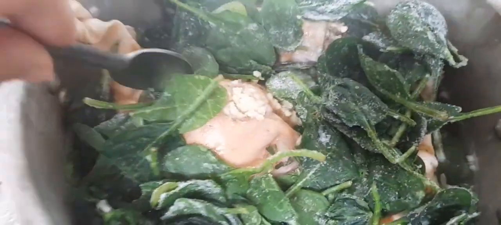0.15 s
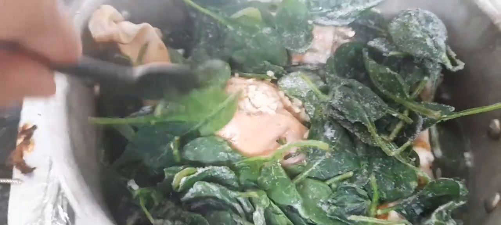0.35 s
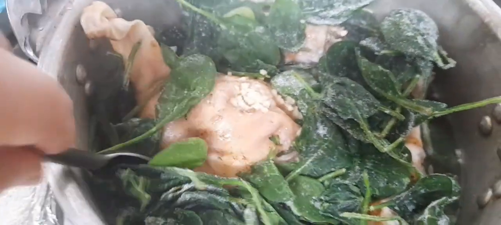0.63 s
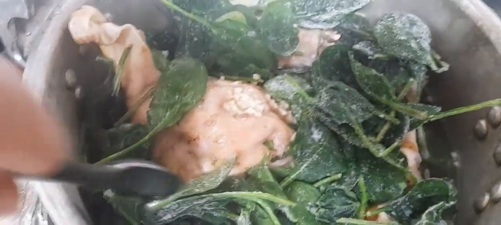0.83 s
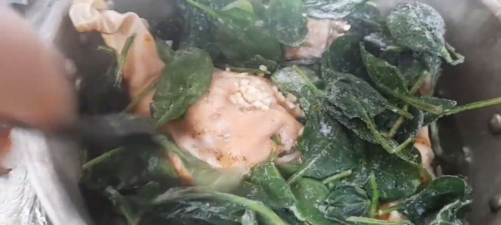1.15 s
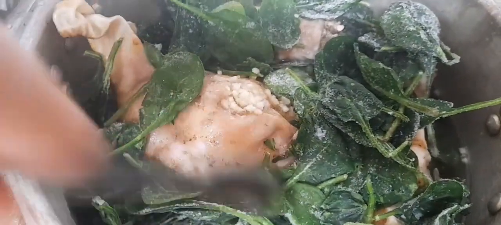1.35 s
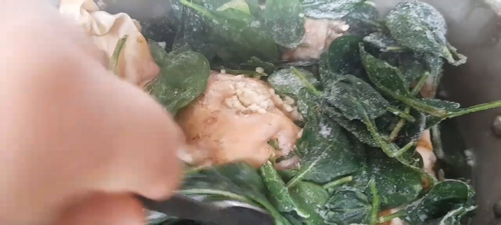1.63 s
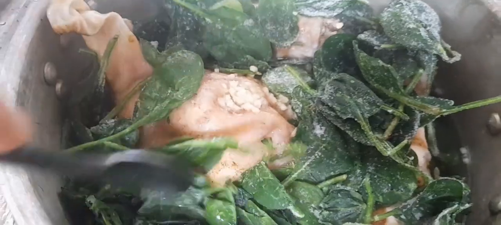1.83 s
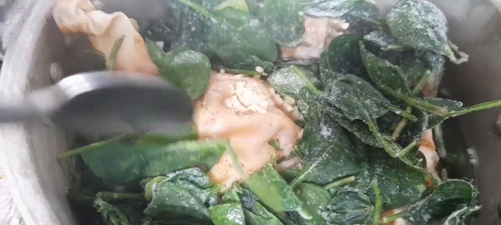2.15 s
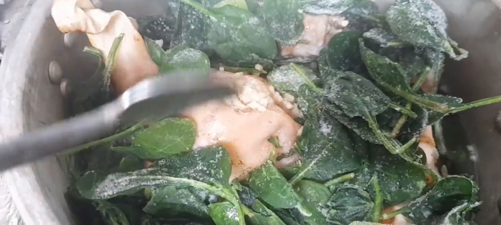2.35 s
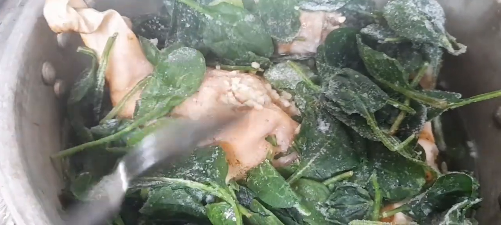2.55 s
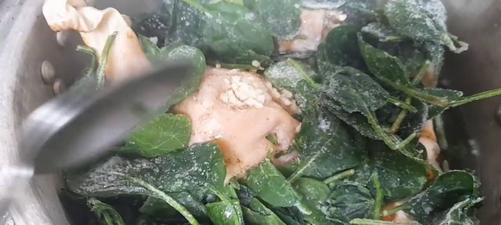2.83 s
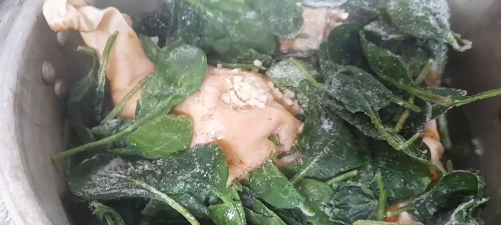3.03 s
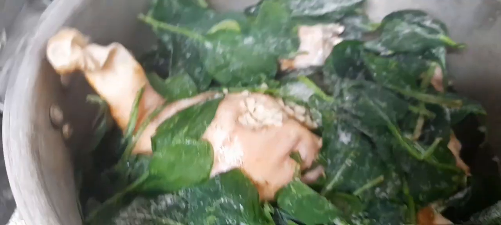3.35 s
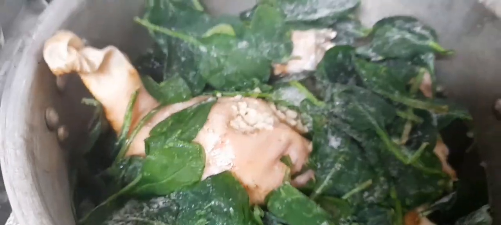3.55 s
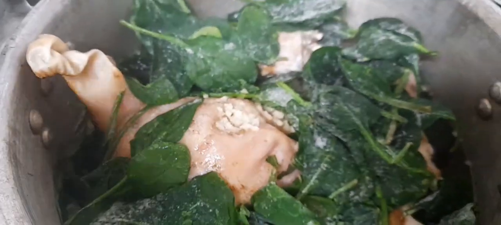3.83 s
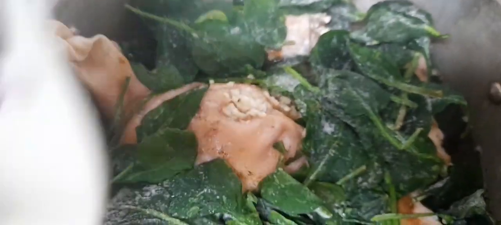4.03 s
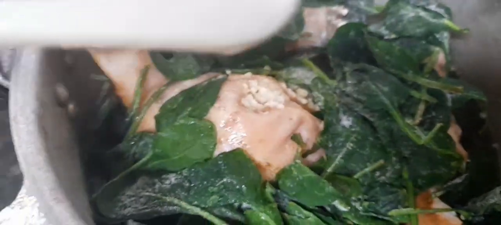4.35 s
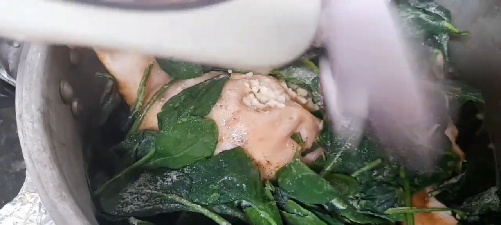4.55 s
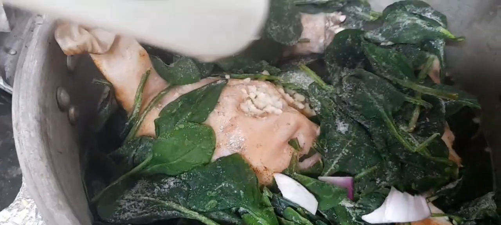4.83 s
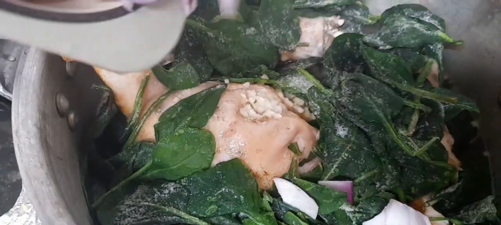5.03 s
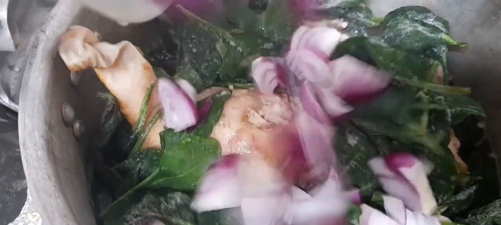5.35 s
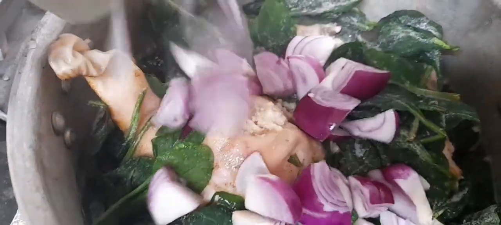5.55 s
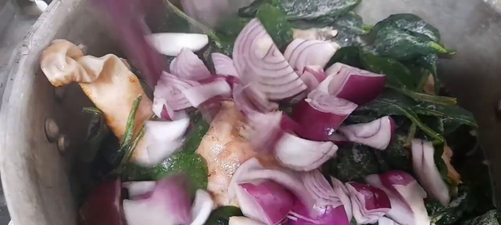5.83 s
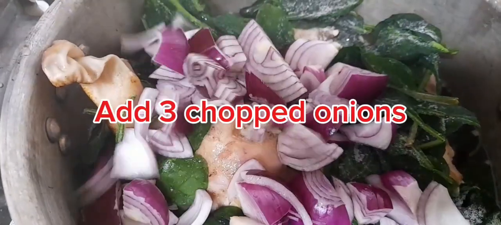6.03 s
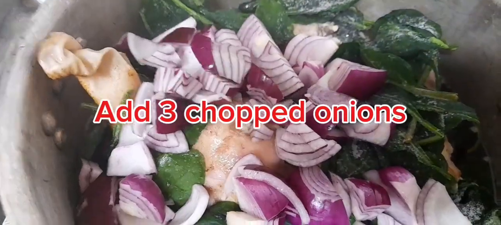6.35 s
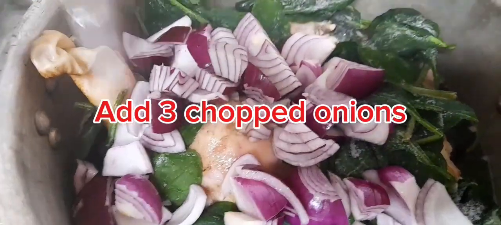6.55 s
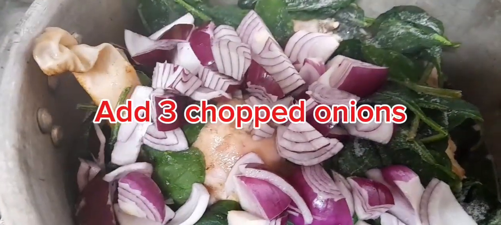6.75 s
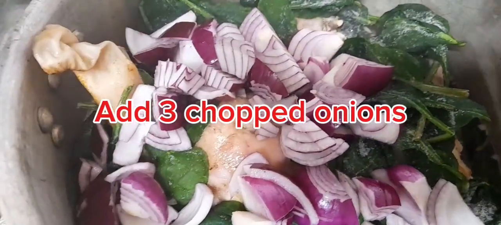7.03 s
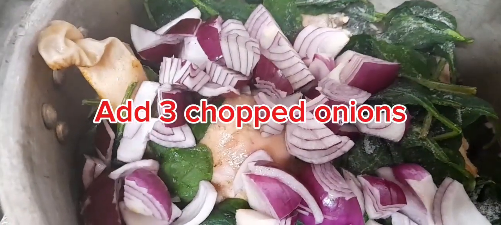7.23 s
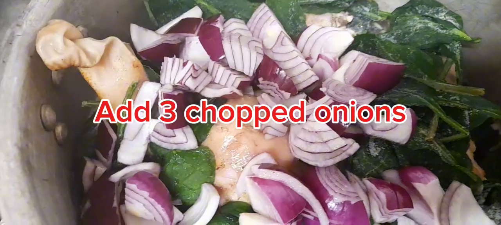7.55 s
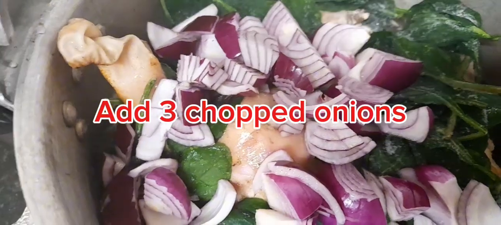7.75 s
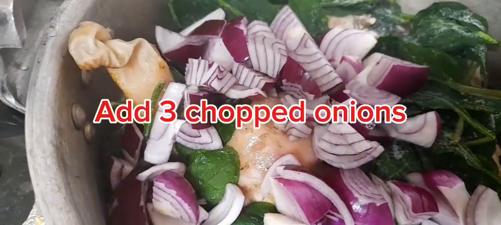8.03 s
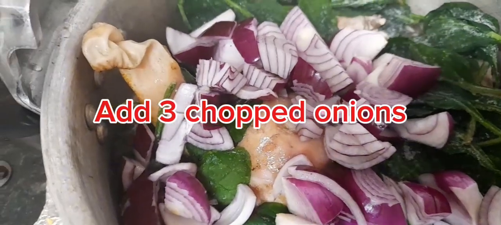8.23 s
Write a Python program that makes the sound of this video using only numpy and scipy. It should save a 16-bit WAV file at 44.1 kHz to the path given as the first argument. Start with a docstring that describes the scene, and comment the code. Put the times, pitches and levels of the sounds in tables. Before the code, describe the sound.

A spoon scrapes and crackles through wet spinach in a metal pot, clacks down loudly, then chopped onion tumbles in while a bird chirps.

```python
"""Spinach and onion in a metal pot

Kitchen, microphone close to the pot. A spoon pushes wet spinach around meat and is put down with a clack.
After a few dull bumps, chopped onion tumbles from a plate onto the leaves and the plate is slid away.
Leaves, friction and onion are filtered random clicks; knocks and bumps are bursts and decaying tones.
A small bird chirps nearby as gliding tones, the room answers briefly, and a faint low drone swells up."""
import sys
import numpy as np
from scipy import signal
from scipy.fft import rfft, irfft
from scipy.io import wavfile
from scipy.ndimage import uniform_filter1d

SR = 44100
rng = np.random.default_rng(int(sys.argv[2]) if len(sys.argv) > 2 else 0)


def put_to_file(sound):
    """Save the sound as 16-bit audio at rate SR, in the file named by the first command-line argument."""
    columns = np.atleast_2d(sound).T  # one column per channel
    safe = np.clip(columns, -1, 1)
    whole_steps = np.round(safe * 32767)
    wavfile.write(sys.argv[1], SR, whole_steps.astype(np.int16))


N = 370440
T = np.arange(N) / SR  # seconds

# Room air at the microphone. Each row: frequency in Hz, relative level in dB.
AIR_SPECTRUM = [(15, -58), (25, -22), (161, -8.5), (212, -19), (335, -14.5), (439, -23.5), (624, -32.5),
                (677, -29.5), (1740, -38), (3920, -37), (4610, -32.5), (7510, -46), (9840, -37.5),
                (14000, -41.5), (16000, -45.5)]
AIR_DB = -70
# Noise that flutters around the drone. Each row: frequency in Hz, relative level in dB.
FLUTTER_SPECTRUM = [(60, -33), (150, -11), (220, 1.5), (300, -1), (370, -19.5), (520, -30), (1500, -62.5)]
# The low drone is faint at first, then swells and holds.
DRONE_HZ, DRONE_FAINT_DB, DRONE_DB, DRONE_STARTS_S, DRONE_SWELL_S = 219, -72.5, -60.5, 3.28, 0.35

# Decay of the small hard kitchen. Each row: frequency in Hz, t60 in seconds.
KITCHEN_DECAY = [(100, .6), (350, .55), (1000, .32), (2500, 0.25), (6000, 0.23), (15000, 0.13)]

# Friction shaking pot and worktop. Each row: frequency in Hz, relative level in dB.
DRAG_BODY_SPECTRUM = [(30, -18), (70, -11.5), (150, -9), (300, 2), (450, -7.5), (700, -16.5), (1200, -29.5),
                      (3000, -62)]
# Rough contact. Each row: frequency in Hz, relative level in dB.
DRAG_GRIT_SPECTRUM = [(250, -19), (600, 2), (900, 4), (1500, -5), (2600, -4.5), (5000, -6.5), (7500, -20),
                      (15000, -18)]
# Pushes of the spoon, later of the plate.
# Each row: start in seconds, length in seconds, body level in dB, grit level in dB.
FIRM_PUSHES = [(0.08, 0.15, -50.5, -57), (0.18, 0.066, -43, -56), (0.27, 0.063, -55, -51),
               (0.39, 0.062, -54.5, -53), (0.45, .1, -55.5, -48), (0.65, .075, -49.5, -45.5),
               (0.915, 0.13, -43, -45.5), (1.235, 0.036, -49.5, -75), (1.41, .075, -48, -47.5),
               (1.5, 0.14, -71, -53), (1.75, 0.089, -46, -52), (1.84, 0.098, -51, -47),
               (1.945, 0.028, -42.5, -51), (2.195, 0.061, -60, -52), (2.305, .045, -54.5, -63.5),
               (2.4, 0.099, -66, -64), (2.575, 0.063, -51, -70.5), (2.625, 0.035, -44, -53.5),
               (7.07, 0.19, -58.5, -74.5), (7.235, 0.16, -57.5, -66), (7.34, 0.14, -49.5, -60),
               (7.455, 0.044, -47.5, -60.5), (7.6, .06, -69, -69), (7.78, 0.09, -74, -59.5),
               (7.825, 0.11, -52.5, -61), (7.98, 0.093, -55, -71), (8.11, 0.22, -56.5, -70),
               (8.22, 0.051, -45.5, -60), (8.3, 0.1, -64, -66.5)]
PUSH_ATTACK_S, PUSH_SAG_DB_PER_S, PUSH_T60_S = .025, 23.5, 0.094
# Between pushes the spoon keeps sliding on the leaves.
# Each row: start in seconds, length in seconds, body level in dB, grit level in dB.
LIGHT_SLIDES = [(0.0, 0.78, -62.5, -64.5), (0.74, 0.62, -57, -58), (1.42, .62, -57.5, -59),
                (2.05, .4, -67, -65)]
SLIDE_ATTACK_S, SLIDE_SAG_DB_PER_S, SLIDE_T60_S = 0.044, 6.5, 0.21

# Wet leaves. Each row: frequency in Hz, relative level in dB.
LEAF_SPECTRUM = [(590, -38), (1000, -20.5), (1790, -20), (2710, -2.5), (2940, -4.5), (3980, -0.5),
                 (6780, -5), (8260, -6.5), (8960, -12), (9940, -4.5), (13900, -5), (16000, -11)]
# The spoon crushes a bunch of leaves. Each row: start in seconds, length in seconds, level in dB.
LEAF_CRUSHES = [(0.081, 0.014, -46), (0.116, 0.023, -36.5), (0.275, 0.071, -51.5), (0.455, 0.021, -39.5),
                (0.497, 0.059, -35), (0.71, 0.068, -43), (0.81, 0.12, -48), (0.9, .15, -35.5),
                (1.06, 0.054, -49), (1.12, 0.18, -56), (1.3, 0.21, -62), (1.48, 0.18, -40.5),
                (1.548, 0.049, -30.5), (1.672, 0.044, -38), (1.724, 0.044, -32.5), (1.815, 0.021, -32),
                (1.884, 0.032, -33), (1.932, 0.017, -34.5), (1.985, 0.0079, -36.5)]
CRUSH_ATTACK_S, CRUSH_SAG_DB_PER_S, CRUSH_T60_S = 0.018, 17.5, 0.12
# Stems that snap. Each row: start in seconds, peak in dB before panning, ring in Hz,
# ring strength as a ratio, left minus right in dB.
STEM_SNAPS = [(0.0823, -33, 4900, 0.11, 6), (0.1225, -23.5, 4500, .1, -11), (0.1515, -22, 3230, 0.26, 3),
              (0.4609, -29.5, 2770, 0.54, 10), (0.5021, -23.5, 4450, .1, 1), (0.8345, -23.5, 4300, .1, 5.5),
              (1.031, -16, 4260, 0.26, -1), (1.0444, -18, 2591, .15, -8), (1.0893, -19, 4230, 1.4, -4.5),
              (1.2537, -29, 6260, .5, 8), (1.5643, -33, 5547, .2, -4), (1.7303, -17.5, 4360, 0.54, 0),
              (1.7695, -16.5, 3400, .8, -4), (1.8835, -18.5, 4740, .3, 0), (1.9075, -15.5, 4500, .6, -4),
              (1.9395, -18.5, 2940, .5, 1), (1.9793, -22.5, 4540, 0.49, 1)]

# Hard knocks of spoon and plate. Each row: start in seconds, level in dB, contact cut-off in Hz,
# room level in dB, left minus right in dB.
HARD_KNOCKS = [(0.715, -2.5, 2670, -7, 0), (2.6631, 7.5, 11750, -2.5, -7.5), (3.349, -34, 4770, -3, -24),
               (3.388, -28, 5400, 2, -14.5), (3.494, -37.5, 11000, -5, -15.5),
               (4.333, -18.5, 5740, 4.5, -7.5), (6.662, -32.5, 5350, -4.5, -2)]
# Clack of the contact. Each row: frequency in Hz, relative level in dB.
CLACK_SPECTRUM = [(60, -20), (150, -3), (300, -3), (600, -9), (1100, -9.5), (2000, -4), (2900, -7.5),
                  (4200, -1.5), (7000, -8.5), (11000, -9.5), (16000, -1.5)]
# Ringing modes of the metal. Each row: frequency in Hz, relative level in dB.
METAL_MODES = [(161.5, -49.5), (290.7, -49.5), (452.2, -53), (969.0, -61), (1453, -54.5), (1642, -60),
               (1949, -59), (2277, -60), (2929, -54.5), (3133, -59.5), (3305, -59.5), (3639, -65),
               (3946, -58.5), (4430, -60.5), (5356, -63), (6029, -61.5), (6137, -65.5), (6934, -69.5)]
METAL_T60_S = 0.26  # at 1 kHz; higher modes die sooner

# Damped bumps, taps and soft landings.
# Each row: start in seconds, level in dB, main pitch in Hz, t60 in seconds.
SOFT_BUMPS = [(2.69, -48, 136.3, 0.72), (3.388, -23.5, 148.3, 0.078), (3.412, -36.5, 110.6, 0.16),
              (3.586, -32, 129.9, 0.14), (3.619, -36, 78, 0.082), (3.915, -46.5, 103.6, 0.33),
              (4.327, -42.5, 303, .1), (4.391, -51, 107.6, 0.23), (4.604, -32.5, 667, 0.0093),
              (4.733, -43, 910, 0.02), (5.351, -32.5, 440, 0.045), (5.712, -49, 570, 0.036),
              (5.746, -40, 453, 0.029), (6.66, -59, 1040, 0.044)]

# Bird chirps. Each row: start in seconds, length in seconds, start pitch in Hz, end pitch in Hz,
# level in dB at the bird, second voice as a ratio of the first, second voice in dB against the first.
BIRD_CHIRPS = [(3.077, 0.027, 2350, 2940, -43, 1.97, -20), (3.602, 0.025, 2400, 3173, -43, 1.485, 6.5),
               (5.132, 0.024, 2490, 3097, -40.5, 1.42, 2.5), (5.243, 0.064, 2714, 3950, -26, 2.4, -38),
               (6.586, 0.04, 2615, 3825, -41, 1.9, -21), (6.734, 0.055, 2440, 3397, -33.5, 1.84, -16.5),
               (7.188, 0.029, 4850, 5550, -39, 1.12, -16), (7.302, 0.025, 4000, 4670, -35.5, 1.12, -11),
               (7.837, 0.025, 5240, 5970, -49.5, 1.17, 0), (7.978, 0.035, 4330, 4600, -34.5, 1.1, -5.5)]
# How early the glide flattens, waver as a share of the pitch, rasp in dB.
CHIRP_BEND, CHIRP_WAVER, CHIRP_RASP_DB = 2.8, 0.047, -17

# Soft rustles of handling. Each row: start in seconds, length in seconds, level in dB.
HANDLING = [(3.28, 0.055, -68), (3.39, .08, -63.5), (3.68, 0.33, -72), (4.93, .06, -70.5),
            (6.79, 0.042, -57), (7.18, 0.14, -69), (7.82, 0.046, -67), (7.98, 0.051, -60),
            (8.11, 0.18, -45.5)]
RUSTLE_ATTACK_S, RUSTLE_SAG_DB_PER_S, RUSTLE_T60_S = 0.047, 52.5, 0.32
# Dry friction. Each row: frequency in Hz, relative level in dB.
RUSTLE_SPECTRUM = [(880, -3), (1500, -9), (4690, -2), (5070, -1), (8740, -11.5), (9850, -4.5), (13700, -5),
                   (16000, -17)]

# Crisp onion. Each row: frequency in Hz, relative level in dB.
ONION_SPECTRUM = [(530, -27.5), (900, -4), (1170, -9.5), (1620, -8.5), (1900, -12), (3640, -1.5), (5160, 2),
                  (7580, -6.5), (14400, -3), (16000, -11.5)]
# Onion thudding on the leaves. Each row: frequency in Hz, relative level in dB.
THUD_SPECTRUM = [(40, -12.5), (120, -4.5), (280, 4.5), (450, -6), (700, -4.5), (950, -3), (1400, -19),
                 (3000, -21.5)]
# Single pieces landing. Each row: start in seconds, peak in dB before panning, ring in Hz,
# ring strength as a ratio, left minus right in dB.
ONION_PIECES = [(4.667, -33, 4660, 0.36, 0), (4.7004, -33, 4000, 0.18, 0), (4.7305, -27.5, 3820, .2, 8),
                (4.743, -34, 3930, .2, -4), (4.7606, -27, 5270, 0.16, 1), (4.7704, -32, 3370, .2, 2),
                (5.2325, -32.5, 3020, .1, 2), (5.3517, -29, 5840, .1, 0), (5.412, -17, 3770, .8, -4.5),
                (5.4665, -23, 5200, .1, 7), (5.544, -25.5, 4660, .2, 2), (5.6211, -32, 4200, .3, 9),
                (5.671, -49, 6030, .1, -3), (5.7408, -25.5, 4300, 0.37, 5), (5.859, -27.5, 5600, .2, 4),
                (5.95, -39.5, 5090, .1, 1), (5.9908, -33.5, 3660, .2, 2)]
# Clumps of onion slide off the plate and tumble in.
# Each row: start in seconds, length in seconds, patter level in dB, thud level in dB.
ONION_CLUMPS = [(5.21, 0.041, -52, -56.5), (5.255, 0.19, -46.5, -48), (5.404, 0.084, -33, -48),
                (5.51, 0.057, -49.5, -51), (5.612, 0.078, -49, -54), (5.71, 0.071, -47, -50),
                (5.82, .1, -50.5, -56.5), (5.945, 0.11, -55.5, -53), (6.125, 0.013, -72, -64.5),
                (6.19, 0.0058, -56, -58)]
CLUMP_ATTACK_S, CLUMP_SAG_DB_PER_S, CLUMP_T60_S = 0.0027, 12.5, 0.17

TOP_HZ = 15900  # upper limit of the recorder


def undb(db):
    """Decibels to gain."""
    return 10 ** (np.asarray(db) / 20)


def unit(response):
    """Scale a response so that it passes noise at the same power."""
    return response / np.sqrt(np.sum(response ** 2, axis=-1, keepdims=True))


def pan(db):
    """Left and right gains for a level difference, left minus right."""
    gains = undb(np.vstack([db, -db]) / 2)
    return gains / np.sqrt(np.mean(gains ** 2, axis=0))


def fade(t, t60):
    """Exponential decay, 60 dB down after t60."""
    return np.exp(-np.log(1000) * t / t60)


def convolve(x, response):
    """Filter mono or stereo sound, keeping its length."""
    return signal.fftconvolve(np.atleast_2d(x), np.atleast_2d(response), axes=1)[:, :x.shape[-1]]


def colour(x, points, size=4096):
    """Causal filter through (Hz, dB) points that keeps the power of white noise."""
    hz, db = np.transpose(points)
    log_hz = np.log(np.fft.rfftfreq(size, 1 / SR) + 1)
    gain = undb(np.interp(log_hz, np.log(hz), db))
    # folding the cepstrum makes the filter minimum phase
    cepstrum = irfft(np.log(gain))
    cepstrum[1:size // 2] *= 2
    cepstrum[size // 2:] = 0
    return convolve(x, unit(irfft(np.exp(rfft(cepstrum)))))


def add(out, s, sound):
    """Mix a sound in at a time in seconds."""
    start = int(s * SR)
    out[:, start:start + sound.shape[-1]] += sound[..., :N - start]


def efforts(table, column, attack_s, sag_db_per_s, release_t60):
    """Gain of a series of (start, length, ..) gestures: each rises, sags, then dies away faster."""
    power = np.zeros(N)
    for row in table:
        start, length = row[:2]
        t = T[:int((length + release_t60) * SR)]
        held = undb(row[column] - sag_db_per_s * t) * np.minimum(t / attack_s, 1)
        release = fade(np.maximum(t - length, 0), release_t60)
        add(power[None], start, (held * release) ** 2)
    return np.sqrt(power)


def grains(rate, spread_db):
    """Random clicks at a rate per second, of spread sizes, with the power evened out over time."""
    sizes = undb(spread_db * np.minimum(rng.exponential(size=N), 4))
    clicks = (rng.random(N) < rate / SR) * sizes * rng.choice([-1, 1], N)
    return clicks / np.sqrt(uniform_filter1d(clicks ** 2, SR // 30) + 1e-3)


def widen(x, second_db):
    """Two unrelated signals: the first alike in both channels, the second stronger on the right."""
    return unit(np.array([1, undb(second_db)])) * np.array([[1, -0.63], [1, -1.5]]) @ x


def diffuse(length):
    """Stereo noise of sound from all sides: long waves reach both channels alike."""
    mid, side = rng.standard_normal((2, length))
    side = signal.sosfilt(signal.butter(1, 900, "high", fs=SR, output="sos"), side)
    return np.array([mid + side, mid - side])


def pot_echo(ring_hz, ring_share, direct_share=0.67, wall_t60=0.035):
    """A click from one spot in the pot: the piece rings for a few cycles and the wall scatters it."""
    t = T[:SR // 20]
    ring = unit(np.sin(2 * np.pi * ring_hz * t) * fade(t, .002))
    walls = unit(diffuse(len(t)) * fade(t, wall_t60))
    # the direct sound arrives at each side up to 13 samples late
    walls[[0, 1], rng.integers(0, 14, 2)] += direct_share
    return unit(convolve((t == 0) + ring_share * ring, walls))


def scatter(clicks, patchy_db=-0.5, count=10):
    """Clicks come in short runs, each from one spot in the pot with its own ring and varying strength."""
    run = np.cumsum(rng.random(N) < 90 / SR).astype(int)
    spot = rng.integers(0, count, N)[run]
    uneven = clicks * undb(patchy_db * rng.standard_normal(N))[run]
    rings_hz = np.geomspace(2700, 14000, count)
    return sum(convolve(uneven * (spot == k), pot_echo(hz, ring_share=.42)) for k, hz in enumerate(rings_hz))


def cracks(table, spectrum, tear_t60, crumble_t60, crumble_db):
    """Each break is a brief dense tear and a short run of smaller clicks."""
    out, t = np.zeros((2, N)), T[:SR // 8]
    for s, db, hz, ring, pan_db in table:
        tear = unit(rng.standard_normal(len(t)) * fade(t, tear_t60))
        sparse = rng.standard_normal(len(t)) * (rng.random(len(t)) < 1500 / SR)
        crumble = unit(sparse * fade(t, crumble_t60))
        sound = colour(convolve(tear + undb(crumble_db) * crumble, pot_echo(hz, ring)), spectrum)
        add(out, s, sound / np.abs(sound).max() * undb(db) * pan(pan_db))
    return out


def kitchen(x):
    """Diffuse tail of a small hard room; the bass stays longest."""
    t = T[:int(SR * .7)]
    hz, t60 = np.transpose(KITCHEN_DECAY)
    noise = rfft(diffuse(len(t)))
    log_hz = np.log(np.fft.rfftfreq(len(t), 1 / SR) + 1)
    tail = 0
    for band, decay in zip(np.eye(len(hz)), t60):
        band_gain = np.interp(log_hz, np.log(hz), band)
        tail = tail + irfft(noise * band_gain, len(t)) * fade(t, decay)
    return convolve(x, unit(tail * (1 - np.exp(-t / 0.0029))))


def background():
    """Quiet room air and a steady low tone inside a band of fluttering noise."""
    air = colour(widen(rng.standard_normal((2, N)), second_db=4.5), AIR_SPECTRUM) * undb(AIR_DB)
    tone = np.sin(2 * np.pi * DRONE_HZ * T)
    flutter = colour(widen(rng.standard_normal((2, N)), second_db=-11.5), FLUTTER_SPECTRUM)
    drone = tone + .6 * flutter
    drone_db = np.interp(T - DRONE_STARTS_S, [0, DRONE_SWELL_S], [DRONE_FAINT_DB, DRONE_DB])
    return air + drone * undb(drone_db)


def dragging(column):
    """Strength of the friction: firm pushes over light sliding."""
    pushes = efforts(FIRM_PUSHES, column, PUSH_ATTACK_S, PUSH_SAG_DB_PER_S, PUSH_T60_S)
    slides = efforts(LIGHT_SLIDES, column, SLIDE_ATTACK_S, SLIDE_SAG_DB_PER_S, SLIDE_T60_S)
    return np.hypot(pushes, slides)


def drags():
    """Stick and slip shakes the pot and the worktop; rough contact adds grit."""
    slips = np.array([grains(rate=700, spread_db=0.5) for _ in range(2)])
    body = colour(widen(slips, second_db=-7.5), DRAG_BODY_SPECTRUM)
    grit = colour(scatter(grains(rate=3800, spread_db=1.5)), DRAG_GRIT_SPECTRUM)
    return body * dragging(2) + grit * dragging(3) * pan(-2.5)


def spinach():
    """Wet leaves crackle under the spoon and stems snap."""
    tearing = scatter(grains(rate=1400, spread_db=5.0), patchy_db=2.6)
    crush_gain = efforts(LEAF_CRUSHES, 2, CRUSH_ATTACK_S, CRUSH_SAG_DB_PER_S, CRUSH_T60_S)
    crush = colour(tearing, LEAF_SPECTRUM) * crush_gain
    snaps = cracks(STEM_SNAPS, LEAF_SPECTRUM, tear_t60=.004, crumble_t60=.04, crumble_db=-8)
    return crush + snaps


def knocks():
    """A hard contact buzzes and chatters for a few milliseconds, rings the metal and wakes the room."""
    out, t = np.zeros((2, N)), T[:SR]
    ring = 0
    for hz, db in METAL_MODES:
        mode_t60 = METAL_T60_S * (hz / 1000) ** -.1
        ring = ring + undb(db) * np.sin(2 * np.pi * hz * t) * fade(t, mode_t60)
    ring = unit(ring)
    buzz = unit(np.sin(2 * np.pi * 2850 * t) * fade(t, 0.0066))
    for s, db, contact_hz, room_db, pan_db in HARD_KNOCKS:
        chatter = unit(diffuse(len(t)) * fade(t, 0.022))
        hit = colour(.9 * (t == 0) + .35 * buzz + 1.1 * chatter, CLACK_SPECTRUM)
        tail = undb(room_db) * (kitchen(hit) + undb(-7.5) * ring)
        sound = hit * pan(pan_db) + tail * pan(pan_db / 3)
        # a softer contact has a lower cut-off
        contact = signal.butter(2, contact_hz, fs=SR, output="sos")
        add(out, s, signal.sosfilt(contact, sound) * undb(db))
    return out


def bumps():
    """Soft blows set off a few quickly damped modes, mostly low."""
    out, t = np.zeros((2, N)), T[:SR // 2]
    modes = [(.62, 0.6), (1, 1), (1.33, .35), (2.1, 0.13)]  # ratio to the main pitch, gain
    for s, db, hz, t60 in SOFT_BUMPS:
        swing = sum(gain * np.sin(2 * np.pi * hz * ratio * t) for ratio, gain in modes)
        soft_start = 1 - np.exp(-2 * hz * t)
        add(out, s, undb(db) * swing * fade(t, t60) * soft_start)
    return out


def bird():
    """Short, rough, rising chirps with two voices of the syrinx, heard mostly by way of the walls."""
    out = np.zeros((1, N))
    for s, length, start_hz, end_hz, db, ratio, second_db in BIRD_CHIRPS:
        u = np.linspace(0, 1, int(length * SR))  # progress through the chirp
        knots = np.linspace(0, 1, 60)
        waver, rasp = (np.interp(u, knots, row) for row in rng.standard_normal((2, 60)))
        glide_hz = end_hz - (end_hz - start_hz) * (1 - u) ** CHIRP_BEND
        phase = 2 * np.pi * np.cumsum(glide_hz * (1 + CHIRP_WAVER * waver)) / SR
        swell = np.sqrt(np.abs(np.sin(np.pi * u))) * (1 + undb(CHIRP_RASP_DB) * rasp)
        voices = np.sin(phase) + undb(second_db) * np.sin(ratio * phase)
        add(out, s, undb(db) * swell * voices)
    near_walls = unit(diffuse(SR // 20) * fade(T[:SR // 20], .04))
    heard = 0.075 * out + 0.2 * convolve(out, near_walls) + 0.3 * kitchen(out)
    return heard * pan(-6.0)


def rustles():
    """Fine dry friction as things are handled beside the pot."""
    gain = efforts(HANDLING, 2, RUSTLE_ATTACK_S, RUSTLE_SAG_DB_PER_S, RUSTLE_T60_S)
    friction = scatter(grains(rate=4700, spread_db=1.0), patchy_db=-1.5)
    return colour(friction, RUSTLE_SPECTRUM) * gain * pan(-5.0)


def onions():
    """Crisp pieces patter on each other and thud on the leaves."""
    patter_gain = efforts(ONION_CLUMPS, 2, CLUMP_ATTACK_S, CLUMP_SAG_DB_PER_S, CLUMP_T60_S)
    thud_gain = efforts(ONION_CLUMPS, 3, CLUMP_ATTACK_S, CLUMP_SAG_DB_PER_S, CLUMP_T60_S)
    patter = colour(scatter(grains(rate=790, spread_db=5.0)), ONION_SPECTRUM) * patter_gain
    thuds = colour(scatter(grains(rate=300, spread_db=-2)), THUD_SPECTRUM) * thud_gain
    pieces = cracks(ONION_PIECES, ONION_SPECTRUM, tear_t60=0.0094, crumble_t60=0.1, crumble_db=0)
    return patter + thuds + pieces


def scene():
    """Sounds in the pot are close and dry; those beside it carry more of the room."""
    close = spinach() + onions()
    beside = drags() + rustles() + bumps()
    room = kitchen(undb(-19) * close + undb(-11) * beside)
    return close + beside + room + knocks() + bird() + background()


def record(dry):
    """The microphone thins the deep bass; the recorder clips at full scale and cuts the highest treble."""
    thin = signal.sosfilt(signal.butter(2, 45, "high", fs=SR, output="sos"), dry)
    top_cut = signal.ellip(10, .2, 70, TOP_HZ, fs=SR, output="sos")
    return signal.sosfilt(top_cut, np.clip(thin, -1, 1))


dry = scene()
out = record(dry)
put_to_file(out)
```